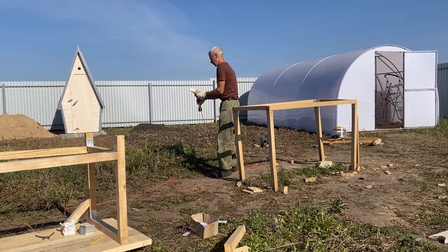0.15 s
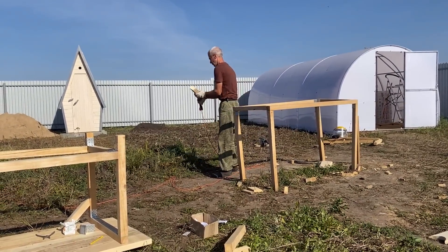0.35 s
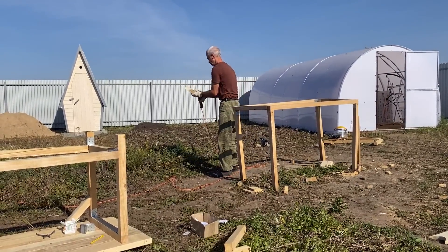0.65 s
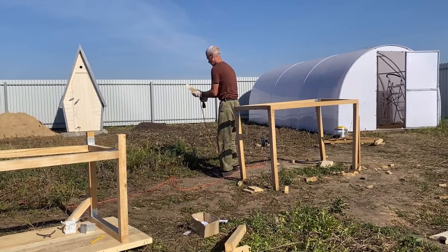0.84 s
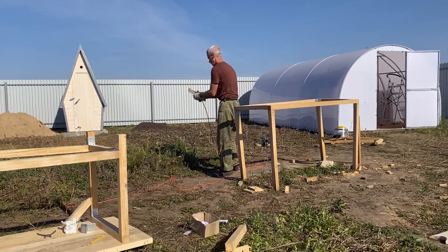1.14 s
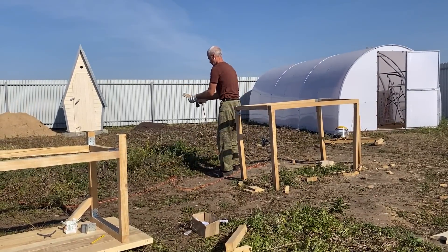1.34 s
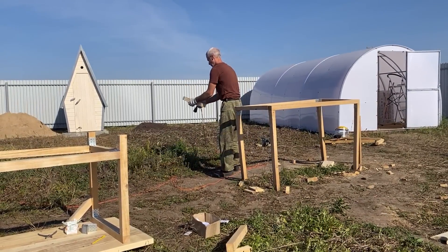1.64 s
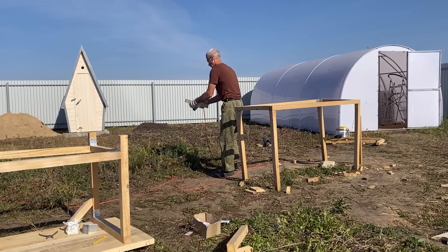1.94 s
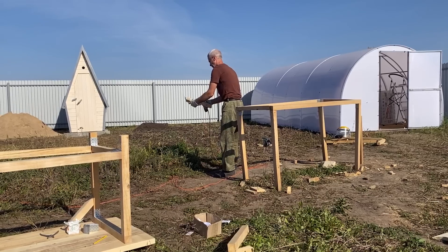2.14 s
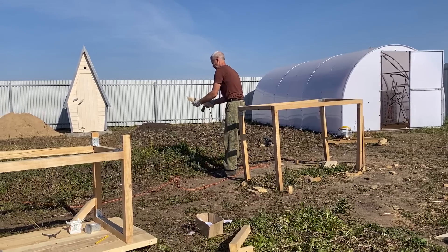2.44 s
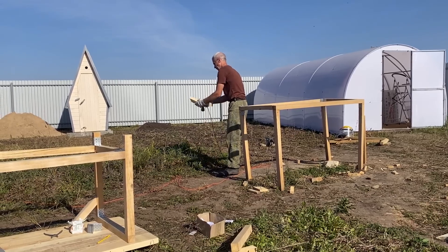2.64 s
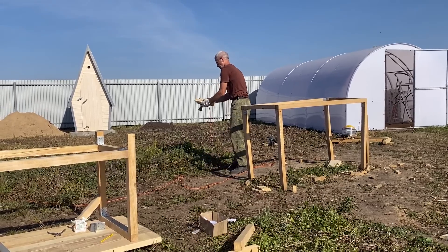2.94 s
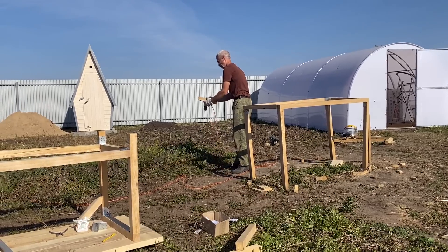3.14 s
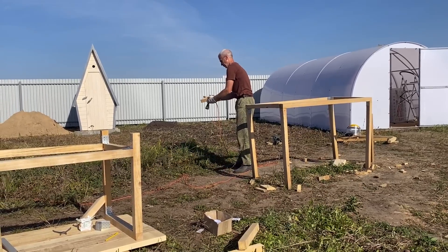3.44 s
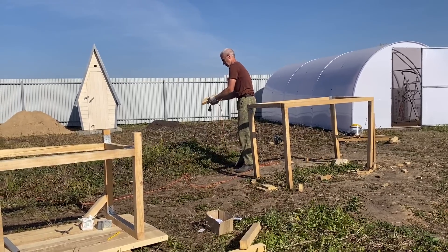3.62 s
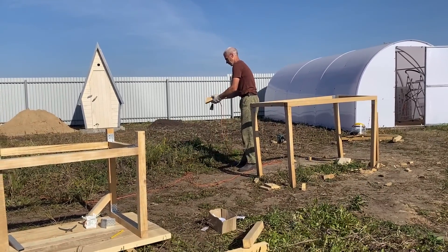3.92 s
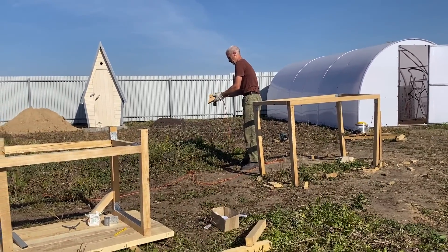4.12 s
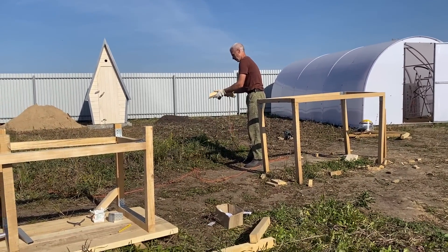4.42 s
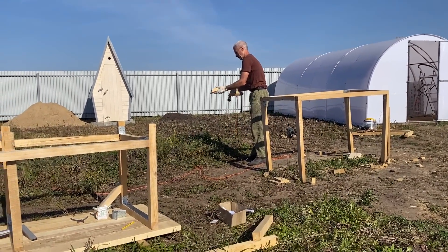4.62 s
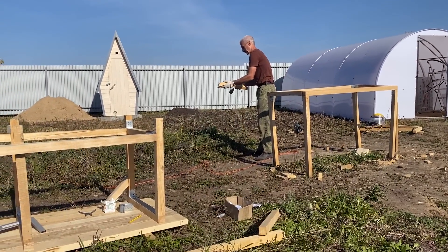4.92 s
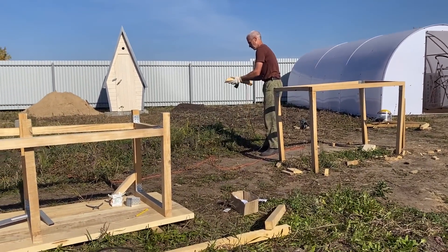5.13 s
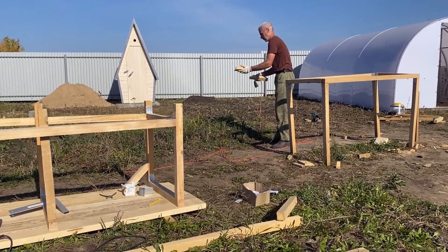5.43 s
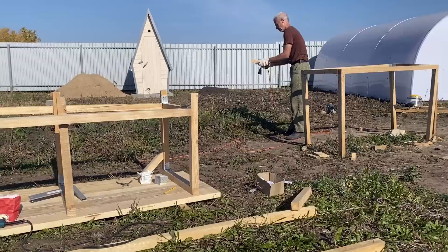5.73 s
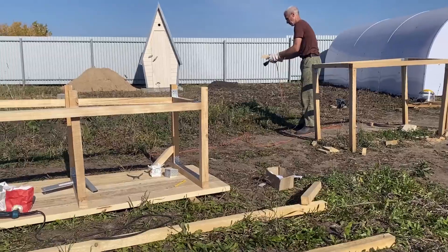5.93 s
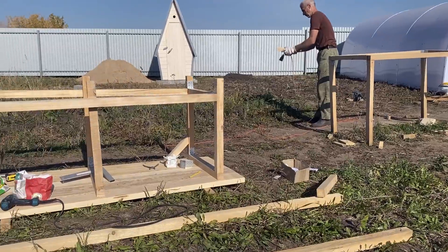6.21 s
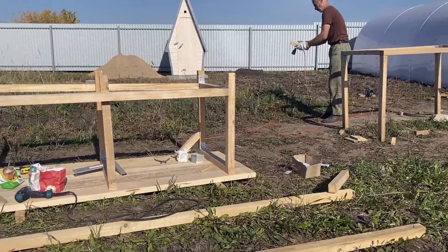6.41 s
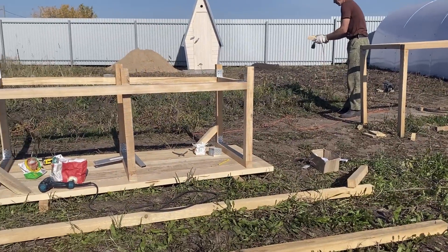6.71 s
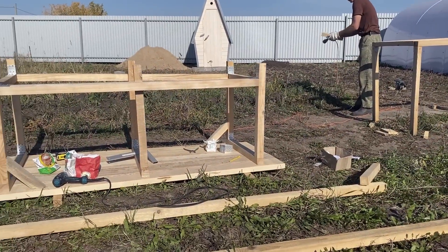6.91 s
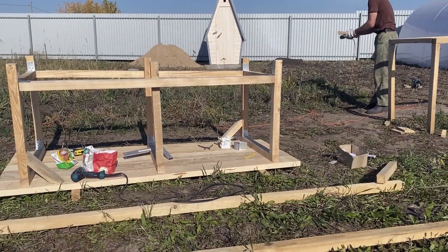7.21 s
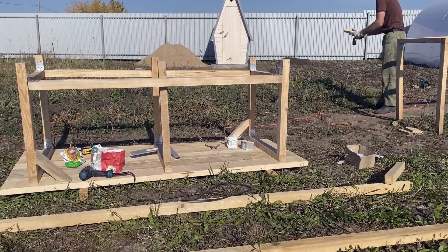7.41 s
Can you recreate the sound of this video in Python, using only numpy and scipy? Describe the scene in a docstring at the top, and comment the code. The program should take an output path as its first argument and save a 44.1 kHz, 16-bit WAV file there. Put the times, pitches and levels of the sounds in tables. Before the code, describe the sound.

In an open yard a man a few metres away hammers a piece of wood held in gloved hands. Three dry knocks come early, one more follows, then weak taps and faint glove scrapes. After a quieter pause, a run of six loud, evenly spaced cracks closes the scene. Each blow slaps off walls and a ribbed metal fence. Light wind and faint hiss, heard on a phone.

```python
"""In a yard, a few metres away, a man hammers a piece of wood held in his hand: single knocks, then a run of six.
Each dry crack joins an impulse, decaying noise and damped modes; walls reflect it, a yard of noise scatters it,
and a ribbed metal fence returns falling chirps. Gloves and wood scrape between blows as grainy filtered noise.
Light wind on the phone, a far rush, hiss and one sinking rush are shaped noise; band-passed impulses add dull
low thumps under three blows of the run, and the phone's limiter holds the peaks."""
import sys
import numpy as np
from scipy import signal
from scipy.fft import rfft, irfft
from scipy.io import wavfile
from scipy.ndimage import uniform_filter1d, minimum_filter1d

SR = 44100
rng = np.random.default_rng(int(sys.argv[2]) if len(sys.argv) > 2 else 0)


def dump_mix(stems):
    """Bounce the given channels to the path in sys.argv[1] as a 16-bit WAV at rate SR."""
    frames = np.atleast_2d(stems).T  # one column per channel
    limited = np.clip(frames, -1, 1)  # hard clip at full scale
    pcm = np.round(limited * 32767).astype(np.int16)
    wavfile.write(sys.argv[1], SR, pcm)


N = 333396
TIME = np.arange(N) / SR
TOP_HZ = 16000

# wind on the microphone [t/s, level/dB before WIND_DB] and its spectrum [f/Hz, level/dB]
WIND = [(0.0, -68), (0.25, -60), (1.07, -58), (1.26, -64), (1.87, -75.5), (2.76, -69.5), (4.63, -73.5),
        (5.98, -65), (6.21, -77), (7.56, -83)]
WIND_COLOUR = [(12, -46.5), (20, -17), (38, -8), (59, 3), (106, -2.5), (162, -19), (250, -31.5),
               (320, -50.5), (550, -120)]
# distant rush of the surroundings [t/s, level/dB before RUSH_DB] and its spectrum [f/Hz, level/dB]
RUSH = [(0.0, -66.5), (1.18, -65.5), (1.35, -71.5), (3.47, -73.5), (5.33, -69), (5.75, -62.5),
        (6.17, -74.5), (7.56, -84)]
RUSH_COLOUR = [(71, -30.5), (120, -3), (294, -5.5), (498, -4.5), (719, -2.5), (785, -3.5), (909, -1.5),
               (1370, -11), (2010, -12.5), (2580, -24.5), (4000, -37), (5200, -60), (8800, -120)]
WIND_DB, RUSH_DB = 3.5, 8  # gains on the two level curves
# spectrum of the steady hiss [f/Hz, level/dB]
HISS_COLOUR = [(1470, -37), (2500, 1.5), (7300, -2), (11500, -5.5), (13500, -16.5), (14600, -6.5),
               (16000, -20.5)]
HISS_DB = -79.5
# rubs of glove and wood [start t/s, end t/s, mid-stroke level/dB, rise from middle to end/dB]
SCRAPES = [(0.08, 0.136, -71.5, 8), (0.433, 0.57, -59.5, 7), (0.703, 0.857, -64, 1.5),
           (1.07, 1.081, -69, -1.5), (2.693, 2.71, -73, 7.5), (4.528, 4.671, -56.5, 10),
           (5.224, 5.307, -46.5, -1.5)]
# spectrum of the rubs [f/Hz, level/dB]
SCRAPE_COLOUR = [(590, -27), (1000, -32), (1590, -4.5), (2310, -13.5), (2500, 0.5), (3190, 2),
                 (3460, -18.5), (4260, -4.5), (5760, -17.5), (7350, -11.5), (8960, -25.5), (11200, -16.5),
                 (16000, -30.5)]
# diffuse field of the yard [f/Hz, level/dB, t60/s]
YARD = [(150, -40, .5), (450, -31, 0.5), (797, -22, 1), (1370, -15, 0.65), (2203, -15, 1.05),
        (3080, -11, 0.96), (3600, -17.5, 0.95), (5353, -10, 0.91), (5900, -16, 0.86), (7940, -14.5, 0.53),
        (8560, -25.5, 0.26), (11000, -21, .55), (16000, -31, 0.39)]
# stretches of ribbed fence [first echo t/s, starting f/Hz, final f/Hz, glide time constant/s, level/dB]
FENCE = [(.055, 3500, 2300, .05, -22), (.105, 2750, 1900, .06, -21), (.15, 2700, 1950, .09, -26)]
# knocks and rebounds [t/s, level/dB before direct gain, favoured f/Hz, emphasis/dB, tilt/(dB per octave),
# crack length/ms (amplitude falls by e squared), left minus right/dB, send to walls and yard/dB]
KNOCKS = [(1.235, -28, 690, 18.5, -3, 2.3, -1, -5.5), (1.2512, -17, 1420, 6.5, 2, 8.8, -0.5, 3),
          (1.264, -29.5, 1200, 7, -2, 2.9, -1.5, -4.5), (1.5335, -15.5, 4800, 8.5, 2.5, 9.7, 2, 2.5),
          (1.5399, -27.5, 1270, 26.5, 1.5, 6, -1, -1), (1.797, -15.5, 1197, 5, 0, 39, -0.5, 0),
          (2.787, -19, 772, 23, 2, 6, -3.5, -0.5), (2.7926, -20.5, 1100, 1, 1.5, 81, 5.5, 1),
          (3.152, -57.5, 740, 10.5, -1.5, 3, 0.5, -4.5), (3.2711, -34, 1310, 17.5, -4, 2.9, -1, -4),
          (3.2857, -49, 948, 15, -9, 4.2, -4, -11), (4.5302, -54.5, 3500, 5.5, 3, 5, -1.5, 3),
          (5.2, -32, 1600, 1.5, -0.5, 20, -1.5, -6.5), (5.876, -13, 778, 6.5, -0.2, 2, 4, -2),
          (5.8858, -22.5, 1960, 7, -2.5, 56, -7.5, -7), (6.151, -13, 4080, 7, 2.17, 4.9, -7.5, -0.5),
          (6.388, -11, 4230, 11.5, 4.5, 10, -4.5, -3.5), (6.6367, -10, 3620, 5.5, 1.5, 12.5, 0.5, -4),
          (6.9086, -10.5, 3600, 5.5, 2.5, 10, -4, -1.5), (7.2411, -11, 3670, 11, 0.5, 51, 2, -1),
          (7.2446, -23.5, 5250, 21, 1, 8.6, 9, -0.5), (7.299, -16, 2610, 26, 0, 33, -0.5, 0)]
# edges of the bands that describe a blow [f/Hz]
KNOCK_BANDS = [120, 400, 750, 1300, 2300, 3400, 4500, 8000, 16000]
# relative spectrum of an average blow, one entry per band [level/dB]
KNOCK_DB = [-27, -14.5, -5.5, -0.5, -2.5, -13, -13, -21.5]
# modes of the wood before the hand damps them [f/Hz, t60/s, relative level/dB]
WOOD = [(214.4, .025, 0.5), (578.8, 0.0058, -8), (893, 0.039, -2), (1076, 0.063, -7.5), (1624, 0.11, -6),
        (1738, 0.046, -2.5), (1982, 0.037, -2), (2403, 0.028, -7.5), (3027, 0.068, 4.5), (3076, 0.019, 3),
        (3890, .026, 5), (3930, 0.072, -2.5), (5410, 0.039, 0), (6850, .018, -14.5), (7700, 0.028, -10.5),
        (10120, 0.0071, -12.5)]
# radiation of the wood, finer than the bands [f/Hz, level/dB]
RADIATION = [(120, 0), (240, 4.5), (370, -2), (560, -2.5), (3100, -1), (3450, -4.5), (3900, 4.5), (7900, 7),
             (9000, -10), (10600, 3), (13000, -8.5), (16000, -7.5)]
# width of the favoured range at 1 kHz; power by which it narrows as its pitch rises
EMPHASIS_OCTAVES, EMPHASIS_NARROWING = 0.6, 0.62
RING_DB = -5  # ring over crack
# the phone turns [t/s, lag of the left microphone/samples]
PORT_LAG = [(2.8, -2), (5.2, -1), (6.6, 2), (7.3, 4)]
# walls around the yard [delay/s, smear/s, level/dB, extra delay at the right microphone/s]
WALLS = [(0.0428, 0.002, -19, .0003), (0.0511, 0.0025, -23.5, .00003), (0.0571, 0.00066, -19.5, 0.000023),
         (.064, 0.0035, -32.5, .0001), (.112, .002, -34.5, 0.00013), (0.143, 0.0035, -39, .0001)]
# a soft rush that sinks in pitch
SINK_START_S, SINK_END_S, SINK_ATTACK_S, SINK_RELEASE_S = 5.22, 5.95, 0.018, 0.099
SINK_FROM_HZ, SINK_TO_HZ, SINK_GLIDE_S, SINK_WIDTH_OCTAVES = 1350, 630, 0.1, 0.46
SINK_DB, SINK_FADE_DB_PER_S = -51, 17.5
# dull low thumps under three blows of the run [t/s, level/dB over 20 ms]
THUMPS = [(6.388, -35), (6.909, -44.5), (7.242, -38.5)]
THUMP_LO_HZ, THUMP_HI_HZ = 117, 298


def undb(db):
    """Amplitude gain follows from the level in decibels."""
    return 10 ** (np.asarray(db) / 20)


def unit(x):
    """Normalisation sets the energy to one."""
    return x / np.sqrt(np.sum(x ** 2, axis=-1, keepdims=True) + 1e-18)


def curve(rows):
    """Linear interpolation joins (t/s, value) rows."""
    return np.interp(TIME, *np.transpose(rows))


def spectrum_db(f, hz, db, **outside):
    """Interpolation of level against the logarithm of frequency."""
    return np.interp(np.log(f + 1), np.log(hz), db, **outside)


def band(x, lo_hz, hi_hz):
    """Causal band-pass filtering."""
    sos = signal.butter(N=4, Wn=[lo_hz, hi_hz], btype="band", fs=SR, output="sos")
    return signal.sosfilt(sos, x)


def add(track, s, sound):
    """Superposition of a stereo sound on a track from time s."""
    i = max(int(s * SR), 0)
    track[:, i:i + sound.shape[1]] += sound[:, :max(track.shape[1] - i, 0)]


def noise(spectrum, side_db):
    """Spectral shaping of white noise to an rms of one; the side part, relative to the mid, sets the width."""
    hz, db = np.transpose(spectrum)
    gain = undb(spectrum_db(np.fft.rfftfreq(N, 1 / SR), hz, db, left=-90, right=-90))
    mid, side = irfft(rfft(rng.standard_normal((2, N))) * gain, N)
    out = mid + undb(side_db) * side * np.array([[1], [-1]])
    return out / out.std()


def colour(x, hz, db):
    """Minimum-phase filtering: folding the cepstrum makes a (f/Hz, level/dB) response causal."""
    size = 2 * x.shape[-1]
    log_gain = np.log(undb(spectrum_db(np.fft.rfftfreq(size, 1 / SR), hz, db)))
    cepstrum = irfft(log_gain)
    cepstrum[1:size // 2] *= 2
    cepstrum[size // 2 + 1:] = 0
    return irfft(rfft(x, size) * np.exp(rfft(cepstrum)))[..., :size // 2]


def voiced_as(x, band_db):
    """Smooth equalisation of a short sound towards given band levels (rms over 20 ms)."""
    edges = np.array(KNOCK_BANDS)
    centres = np.sqrt(edges[1:] * edges[:-1])
    first_bins = (edges * x.shape[-1] / SR).astype(int)
    for _ in range(2):
        power = np.mean(np.abs(rfft(x)) ** 2, axis=0) * 2 / x.shape[-1] / (0.02 * SR)
        now_db = 10 * np.log10(np.add.reduceat(power, first_bins)[:-1] + 1e-18)
        x = colour(x, centres, band_db - now_db)
    return x


def outdoors():
    """Broadband background: wind rumble and a far rush of varying level over a faint steady hiss."""
    wind = noise(WIND_COLOUR, side_db=-14.5) * undb(curve(WIND) + WIND_DB)
    rush = noise(RUSH_COLOUR, side_db=1) * undb(curve(RUSH) + RUSH_DB)
    hiss = noise(HISS_COLOUR, side_db=-2.0) * undb(HISS_DB)
    return wind + rush + hiss


def scrapes(yard, grain_db=3, edge_s=0.025, yard_db=-3):
    """Friction: short rubs made of uneven grains, whose sound lingers in the yard by convolution."""
    swell = np.zeros(N)
    for start, end, db, last_db in SCRAPES:
        along = np.clip((TIME - start) / (end - start), 0, 1)
        gate = np.clip(np.minimum(TIME - start, end - TIME) / edge_s + 0.5, 0, 1)
        swell += gate * undb(db + last_db * (2 * along - 1))
    # each grain holds one random level for 100 samples
    grain_levels = np.repeat(rng.standard_normal(N // 100 + 1), 100)[:N]
    grains = undb(grain_db * grain_levels)
    grains /= np.sqrt(np.mean(grains ** 2))
    rubs = noise(SCRAPE_COLOUR, side_db=-2.5) * swell * grains
    return rubs + undb(yard_db) * signal.fftconvolve(rubs, yard, axes=1)[:, :N]


def yard_tail(flutter_db=4.0, far_s=0.19, far_db=3):
    """Diffuse scattering: thin at first, fluttering, swelling as the far fence answers, each pitch with its t60."""
    onset_s, early_db = 0.052, -7
    hz, db, t60 = np.transpose(YARD)
    f, t, cells = signal.stft(rng.standard_normal((2, SR)), SR, nperseg=256)
    db = spectrum_db(f, hz, db)[:, None]
    t60 = spectrum_db(f, hz, t60)[:, None]
    # the root gives a tail its stated level whatever its t60
    fade = undb(db - 60 * np.maximum(t - onset_s, 0) / t60) * np.sqrt(2 * np.log(1000) / (t60 * SR))
    swell_db = early_db * (t < onset_s) + far_db * np.exp(-((t - far_s) / 0.013) ** 2)
    flutter = unit(undb(flutter_db * rng.standard_normal(len(t)))) * np.sqrt(len(t))
    return signal.istft(cells * fade * undb(swell_db) * flutter * (t > 0), SR)[1][:, :SR]


def fence_echoes():
    """Periodic reflection: every rib returns a tick, further ticks spread out, so the echo is a falling chirp."""
    out = np.zeros((2, SR))
    t = TIME[:SR // 2]
    for delay, start_hz, end_hz, length, db in FENCE:
        hz = end_hz + (start_hz - end_hz) * np.exp(-t / length)
        phase = 2 * np.pi * (np.cumsum(hz) / SR + rng.random((2, 1)))
        # the tick series is kept to its first two harmonics
        chirp = (np.sin(phase) + np.sin(2 * phase)) * np.sqrt(t) * np.exp(-2 * t / length)
        uneven = 1 + 6 * uniform_filter1d(rng.standard_normal((2, len(t))), 100)
        # the level holds within the band that the chirp sweeps
        swept_share = (start_hz - end_hz) / (SR / 2)
        add(out, delay, undb(db) * np.sqrt(2 * swept_share) * unit(chirp * uneven))
    return out


def blow_colour(level_db, pitch_hz, emphasis_db, tilt_db):
    """Impact spectrum: a harder contact tilts it up, and the striking point favours one range of pitch."""
    edges = np.array(KNOCK_BANDS)
    octaves = np.log2(np.sqrt(edges[1:] * edges[:-1]) / pitch_hz)
    width = EMPHASIS_OCTAVES * (1000 / pitch_hz) ** EMPHASIS_NARROWING
    emphasis = emphasis_db * np.exp(-(octaves / width) ** 2 / 2)
    db = np.array(KNOCK_DB) + tilt_db * octaves + emphasis
    return level_db + 20 * np.log10(unit(undb(db)))


def knock(crack_ms, ring_db, band_db, own_db=-7, contact_s=0.00017, face_db=3):
    """Impact excitation: the face strikes, fibres crunch for some ms, and the hand-damped modes ring briefly."""
    t = TIME[:3000]
    hz, t60, db = np.transpose(WOOD)
    detune, strength = rng.standard_normal((2, len(hz)))
    # grip and striking point shift the modes a little from blow to blow
    shifted_hz = hz * (1 + 0.012 * detune)
    modes = np.sin(2 * np.pi * np.outer(shifted_hz, t)) * undb(-60 * t / t60[:, None])
    # the gloved hand chokes the vibration almost at once
    choke = 0.06 + np.exp(-(t / 0.009) ** 2)
    mode_gains = undb(db + 2 * strength) * (-1) ** np.arange(len(hz))
    ring = unit(mode_gains @ modes * choke)
    crunch = choke * np.exp(-2 * t / (crack_ms / 1000)) + 0.3 * np.exp(-t / contact_s)
    shared, left, right = unit(rng.standard_normal((3, len(t))) * crunch)
    # the ground scatters a slightly different crack to each microphone
    crack = shared + undb(own_db) * np.array([left, right])
    # the flat face lands as one clean pressure pulse
    raw = undb(face_db) * (t == 0) + crack + undb(ring_db) * ring
    radiated = band(colour(raw, *np.transpose(RADIATION)), 75, TOP_HZ)
    return voiced_as(radiated, band_db)


def wall_echoes(scatter_db=-2):
    """Reflection: shed, greenhouse and fence each return a mirror echo, smeared by their uneven faces."""
    out = np.zeros((2, SR // 4))
    t = TIME[:SR // 20]
    for delay, smear, db, lag in WALLS:
        scatter = unit(rng.standard_normal(len(t)) * np.exp(-t / smear))
        slap = undb(db) * unit((t == 0) + undb(scatter_db) * scatter)
        add(out, delay, np.outer([1, 0], slap))
        add(out, delay + lag, np.outer([0, 1], slap))
    return out


def hammering(yard):
    """Superposition of each blow's paths: direct, off the walls, and scattered through the yard."""
    direct, to_walls, to_yard = np.zeros((3, 2, N))
    click = band(signal.unit_impulse((1, 3000)), 110, TOP_HZ)
    for s, level_db, pitch_hz, emphasis_db, tilt_db, crack_ms, pan_db, yard_db in KNOCKS:
        band_db = blow_colour(level_db, pitch_hz, emphasis_db, tilt_db)
        blow = knock(crack_ms, RING_DB, band_db)
        lag = int(round(np.interp(s, *np.transpose(PORT_LAG))))
        add(direct, s + lag / SR, blow * undb(pan_db / 2) * np.array([[1], [0]]))
        add(direct, s, blow * undb(-pan_db / 2) * np.array([[0], [1]]))
        add(to_walls, s, undb(yard_db) * blow[:1])
        # the yard gathers all directions, so only the broad colour of the blow is left
        add(to_yard, s, undb(yard_db) * voiced_as(click, band_db))
    slaps = signal.fftconvolve(to_walls, wall_echoes(), axes=1)[:, :N]
    scattered = signal.fftconvolve(to_yard, yard, axes=1)[:, :N]
    return undb(0.5) * direct + slaps + scattered


def sinking_rush():
    """Time-varying filtering: a broad soft band of noise slides down and fades."""
    white = noise([(20, 0), (SR / 2, 0)], side_db=-6)
    f, t, cells = signal.stft(white, SR, nperseg=1024)
    age = np.maximum(t - SINK_START_S, 0)
    hz = SINK_TO_HZ + (SINK_FROM_HZ - SINK_TO_HZ) * np.exp(-age / SINK_GLIDE_S)
    gate = np.clip(np.minimum(age / SINK_ATTACK_S, (SINK_END_S - t) / SINK_RELEASE_S), 0, 1)
    hump = np.exp(-(np.log2((f + 1) / hz[:, None]) / SINK_WIDTH_OCTAVES) ** 2 / 2)
    level = gate * undb(SINK_DB - SINK_FADE_DB_PER_S * age)
    gain = unit(hump).T * np.sqrt(len(f)) * level
    return signal.istft(cells * gain, SR)[1][:, :N]


def thumps():
    """Band-passed impulse: one low, dull thump under each listed blow."""
    out = np.zeros((2, N))
    pulse = unit(band(signal.unit_impulse((1, SR // 10)), THUMP_LO_HZ, THUMP_HI_HZ))
    for s, db in THUMPS:
        add(out, s, undb(db) * pulse * np.sqrt(0.02 * SR))
    return out


def scene():
    """Superposition of all sources in the yard, whose fence and tail form one impulse response."""
    yard = fence_echoes() + yard_tail()
    return hammering(yard) + thumps() + scrapes(yard) + sinking_rush() + outdoors()


def record(dry, ceiling=0.94):
    """Look-ahead limiting: gain falls around each peak to hold it at the ceiling; a low-pass cuts the top."""
    room = np.minimum(1, ceiling / (np.abs(dry).max(axis=0) + 1e-9))
    gain = uniform_filter1d(minimum_filter1d(room, size=41), size=41)
    low_pass = signal.ellip(8, 0.2, 70, TOP_HZ, fs=SR, output="sos")
    return signal.sosfilt(low_pass, dry * gain)


dry = scene()
out = record(dry)
dump_mix(out)
```